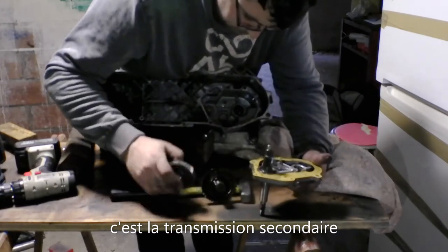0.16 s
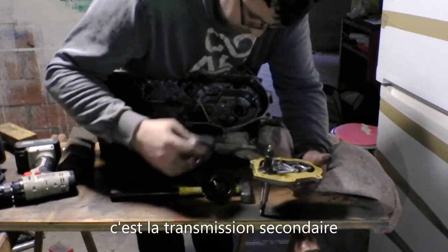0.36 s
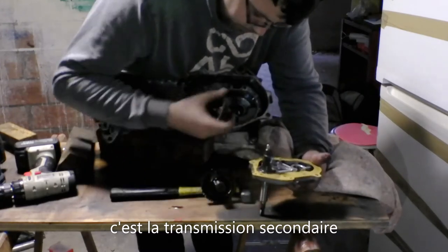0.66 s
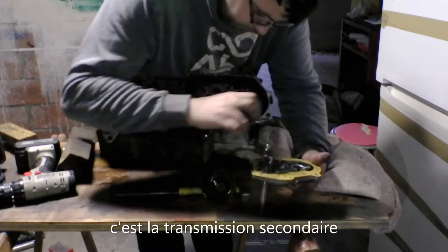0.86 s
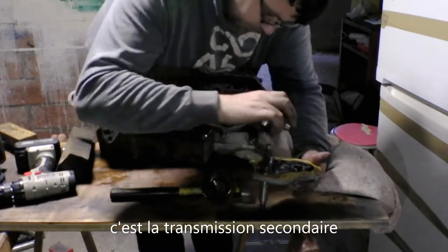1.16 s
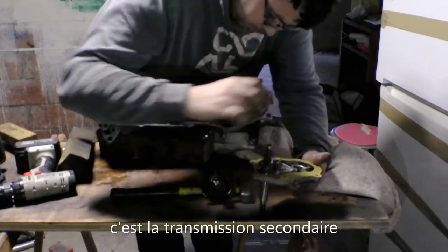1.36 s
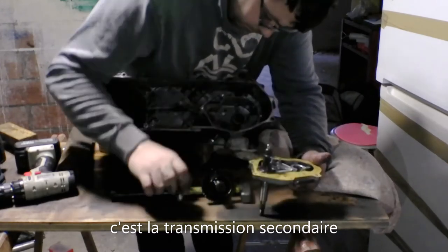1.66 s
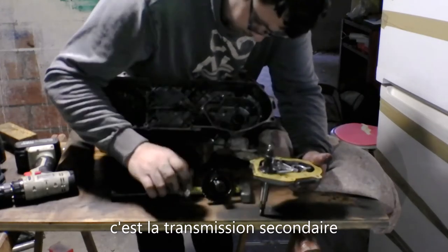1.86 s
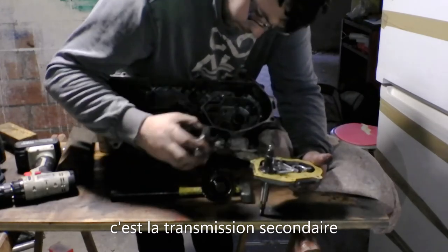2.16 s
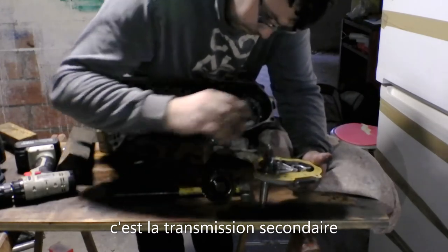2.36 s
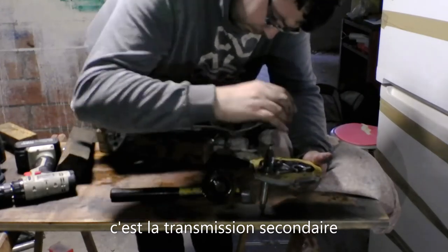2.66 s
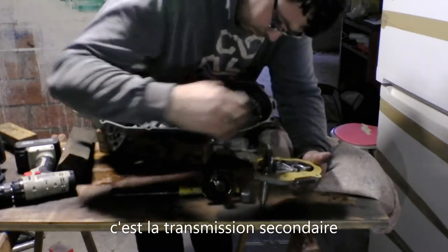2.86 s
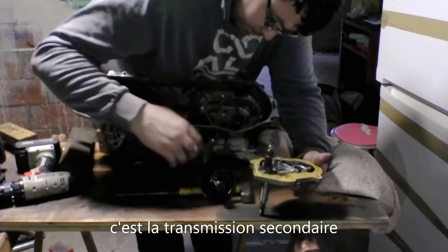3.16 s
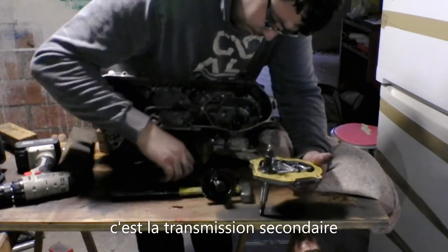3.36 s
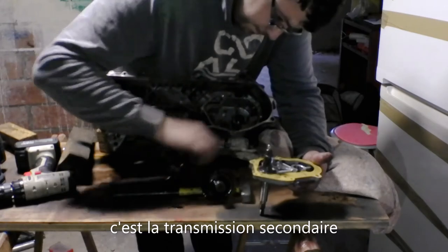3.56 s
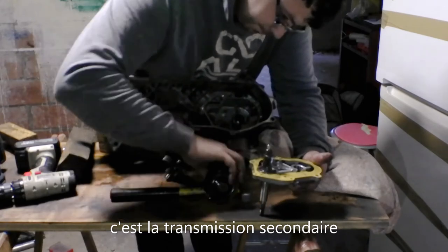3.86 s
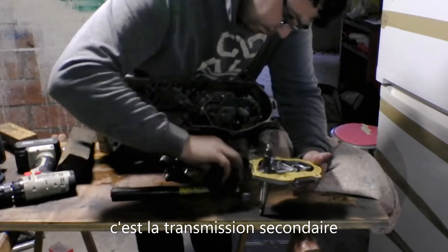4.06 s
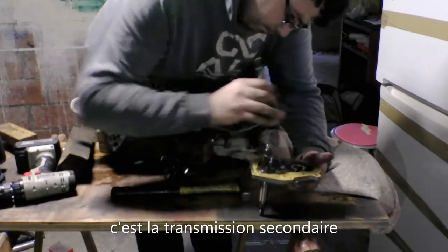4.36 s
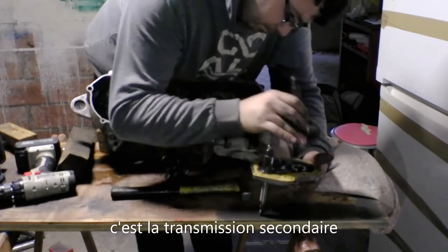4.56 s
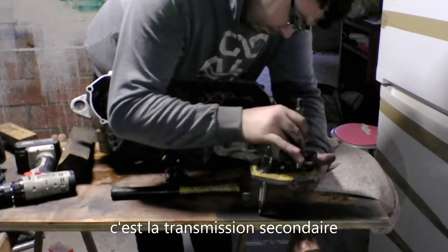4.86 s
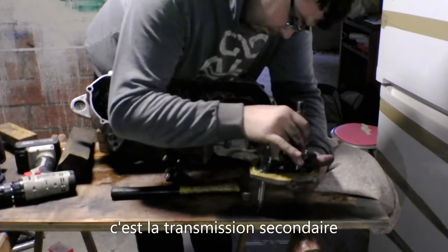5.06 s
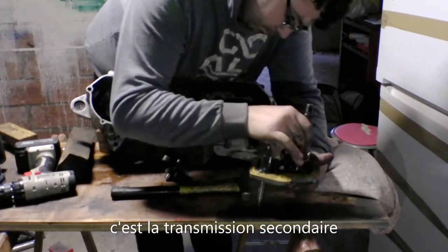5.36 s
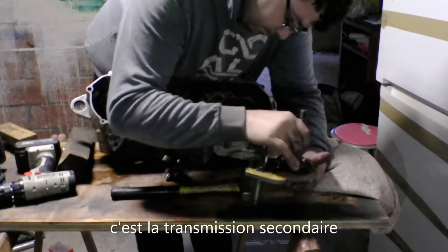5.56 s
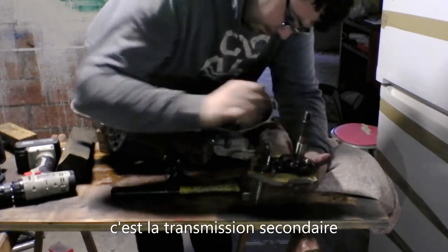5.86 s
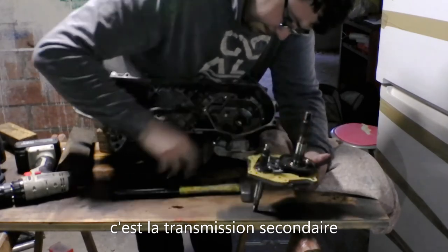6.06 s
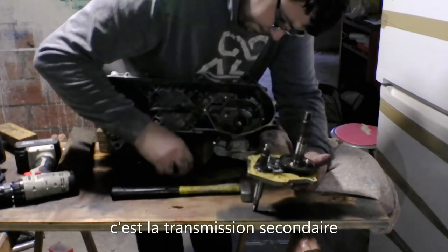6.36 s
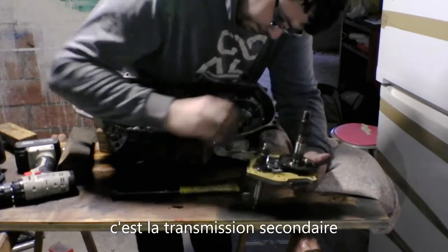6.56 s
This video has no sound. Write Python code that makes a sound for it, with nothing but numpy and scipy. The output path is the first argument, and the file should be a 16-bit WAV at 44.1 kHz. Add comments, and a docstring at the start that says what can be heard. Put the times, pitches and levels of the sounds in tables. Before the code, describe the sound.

A steel gear drags off an engine case and comes free with a loud, rattling clunk. After a pause it is set on a wooden bench with two dull knocks, and another gear clinks sharply. Gears and shafts then slide and tap against a metal cover, before a faint sleeve brush and a small scrape. The microphone is a couple of metres away in a small workshop with quiet hiss.

```python
"""Gearbox parts on a wooden bench in a small workshop, one microphone a couple of metres away.
First a gear drags off the engine case with a clunk (1.4 s). It is set down on the bench (3.3 s), and a
second gear clinks as it is picked up (4 s). From 4.7 s gears and shafts are slid and knocked into the
cover plate; last, a sleeve brushes the bench and a small part scrapes over it. Each blow rings a part's
modes with a short, dense clatter; the room answers, over a quiet hiss."""
import sys
import numpy as np
from scipy import signal
from scipy.fft import rfft, irfft, next_fast_len
from scipy.io import wavfile
from scipy.ndimage import uniform_filter1d, minimum_filter1d

SR = 44100
rng = np.random.default_rng(int(sys.argv[2]) if len(sys.argv) > 2 else 0)


def output_pcm(signal):
    """Save a mono or channel-first signal as 16-bit PCM at the path in sys.argv[1].

    Samples are clipped to [-1, 1] before scaling.
    """
    pcm = np.clip(np.atleast_2d(signal).T, -1, 1) * 32767
    wavfile.write(sys.argv[1], SR, np.round(pcm).astype(np.int16))


N = 295911

# blows at the bench: (t/s, part, strength/dB, hardness of the contact as a treble corner f/Hz)
BLOWS = [ (1.387, "case", -27.5, 1500), (1.388, "bench", -22, 1000), (1.3913, "pin", -25.5, 13000),
         (1.3984, "pin", -21.5, 13000), (1.402, "case", -22, 4000), (1.4157, "case", -9, 1600),
         (1.4256, "case", -15.5, 9000), (1.429, "pin", -11.5, 13000), (1.4319, "pin", -10, 11000),
         (1.436, "pin", -25, 8000), (1.441, "case", -18.5, 3000), (1.4550, "cover", -29, 2000),
         (1.457, "cover", -17.5, 1250), (1.478, "pinion", -30.5, 1620), (1.539, "cover", -32, 1700),
         (1.555, "cover", -35.5, 2200), (3.3268, "bench", -25.5, 1050), (3.3280, "wheel", -27, 1600),
         (3.4966, "bench", -24.5, 2000), (3.4954, "wheel", -20, 11100), (3.5145, "wheel", -24.5, 700),
         (3.953, "wheel", -46, 2500), (4.0130, "gear", -9, 13000), (4.018, "case", -24.5, 3000),
         (4.0250, "case", -24.5, 2500), (4.0387, "cover", -24.5, 1200), (4.0451, "case", -25, 1000),
         (4.0551, "cover", -24, 1300), (4.061, "case", -27.5, 1000), (4.082, "cover", -48, 1500),
         (4.7166, "shaft", -16.5, 12000), (4.7293, "pinion", -27, 2500), (4.8446, "pinion", -25.5, 1700),
         (4.8549, "pinion", -30, 1700), (4.875, "pinion", -37.5, 9000), (4.885, "pinion", -21.5, 12000),
         (4.8925, "cover", -29.5, 2500), (4.9017, "pinion", -37, 9000), (5.275, "washer", -53.5, 12900),
         (5.343, "washer", -43, 11900), (5.3586, "cover", -28.5, 2000), (5.3712, "case", -37.5, 2000),
         (5.4783, "cover", -14.5, 9000), (5.494, "case", -30.5, 2000), (5.555, "cover", -46, 1800),
         (6.089, "pinion", -44.5, 12000)]


def knocks():
    """Parts strike and bounce on each other and on the bench, one blow for each contact."""
    out = np.zeros(N)
    for at_s, part, strength_db, hard_hz in BLOWS:
        start = int(at_s * SR)
        sound = blow(part, strength_db, hard_hz)[:N - start]
        out[start:start + len(sound)] += sound
    return out


# ringing modes of each part: (f/Hz, relative level/dB, t60/s)
CASE = [(175, -15, 0.22), (204.2, -10.5, 0.18), (241, -5.5, .16), (388, -6.5, .13), (459.5, 1.5, 0.18),
        (541, 2, .16), (583, -13, 0.15), (662, -18.5, .14), (810, -2.5, 0.12), (880, -5, .17),
        (940, -4, 0.14), (997, -7, 0.1), (1092, 1, 0.09), (1180, -14, .17), (1210, -8.5, 0.11),
        (1252, -8, 0.13), (1315, -5, 0.16), (1475, -9, 0.09), (1537, -10, 0.13), (1723, -12, .22),
        (1870, -14, 0.37), (1896, -12.5, 0.71), (2210, -15, 0.14), (2650, -20, .24), (2950, -16.5, .3),
        (2970, -18.5, .22)]
PIN = [(1920, -10, .12), (2190, -8.5, 0.072), (2610, -4, .08), (2904, -4.5, 0.11), (2983, -5.5, 0.053),
       (5346, -6.5, 0.06), (5650, -9, 0.11), (6720, -11, 0.085), (7270, -9.5, 0.11)]
BENCH = [(164, -11, .11), (187, -4, 0.12), (238, -4, .075), (326, -13.5, 0.23)]  # the wooden top
WHEEL = [(475.5, 0, 0.12), (550, -12, 0.074), (547, -17, 0.092), (657, -11.5, 0.09), (697, -20.5, 0.12),
         (1057, -13, .11), (1181, -15.5, 0.037), (1346, -19.5, 0.072), (1580, -17, .035),
         (1766, -12.5, .08), (2410, -13, .05), (2652, -8, 0.053), (2726, -7.5, 0.062), (3110, -10.5, .03),
         (3635, -15.5, .045), (3870, -14, 0.035), (4414, -11, 0.03)]  # the gear set down on it
GEAR = [(2993, 4, .24), (6030, -11, .11), (6693, -9.5, .24), (7225, -26, .15), (7362, -16.5, .21),
        (9560, -32, .04), (11600, -31, .07)]
SHAFT = [(420, -8, .06), (689, -14, .07), (1080, -1, .045), (1190, 0, .035), (1400, -11, .05),
         (1556, -13, .07), (1822, -7, .07), (1943, -13, .07), (2139, -9, .055), (3018, -14, .13),
         (3341, -4, .045), (3500, -10, .03), (3672, 4.5, .066), (3817, -4, .115), (4129, -17, .17),
         (4286, -15, .04), (5770, -20, .05), (5884, -23, .09), (6040, -25, .15), (7371, -18, .17)]
PINION = [(1125, -9.5, 0.05), (2070, -6.5, .1), (2140, 0.5, .07), (2360, -10, .12), (2455, 2, 0.058),
          (2740, 2.5, .048), (3040, -2, 0.079), (3200, -24, .086), (3470, 8.5, 0.032), (3580, 7.5, 0.045),
          (3670, -6.5, .1), (4080, 1, 0.11), (4110, -14, 0.12), (4160, -10, 0.074), (5100, -18, 0.065),
          (5970, -21.5, 0.073), (6550, -20, .06), (7800, -17, 0.04)]
WASHER = [(2650, 4.5, 0.09), (2720, 4.5, .06), (3600, 5, 0.077), (4500, -7, 0.1), (6410, -2.5, .04),
          (7560, -8, .04)]
COVER = [(1040, -20.5, 0.06), (1090, -8.5, 0.055), (1200, 3.5, 0.038), (1330, -2.5, 0.035),
         (1456, -16.5, .11), (1975, -5, .03), (2125, -13, 0.045), (2340, -15.5, 0.085), (2577, -7, .015),
         (2790, -25, 0.14), (3390, -16, 0.11), (3480, -14, 0.029), (3880, -6.5, 0.024), (4400, -17, 0.056),
         (4440, -13.5, 0.041), (6270, -20, .025)]
# spectrum of each part's dense, quickly damped modes: (f/Hz, relative level/dB)
CASE_DENSE = [(40, -26.5), (100, -14), (190, -1.5), (480, 0.5), (620, 3.5), (720, -6), (850, -0.5),
              (1150, -0.5), (1700, -16.5), (3000, -37), (5000, -14), (8000, -26), (12000, -43.5)]
PIN_DENSE = [(100, -23), (500, -7.5), (1200, 6.5), (2200, -8.5), (3200, -5.5), (4500, -3), (6500, -6),
             (7800, -14), (9000, -34), (12000, -35)]
BENCH_DENSE = [(50, -28.5), (115, -18.5), (175, 5), (250, 5), (340, -3.5), (850, -18.5), (3000, -44)]
WHEEL_DENSE = [(100, -30), (340, -13), (480, -2), (620, -6), (850, -14.5), (1500, -11), (2200, -14.5),
               (4400, -20), (6300, -24), (8500, -42), (12000, -79)]
GEAR_DENSE = [(100, -40), (400, -6.5), (1200, -1), (2200, -2.5), (3000, -2.5), (4100, 6), (4900, -2),
              (5400, -16.5), (6500, -8), (7600, -2), (9000, -36), (12000, -63.5)]
SHAFT_DENSE = [(80, -29.5), (290, -25.5), (400, -8.5), (620, -1), (1150, -1.5), (1800, 0), (2600, -8.5),
               (3600, -1), (4800, -14.5), (7500, -20), (8800, -43), (12000, -62.5)]
PINION_DENSE = [(100, -29.5), (500, -9), (850, -7), (1150, 6.5), (1600, -1), (2300, 3), (4000, -1),
                (5000, -8.5), (7800, -11), (9500, -26.5), (12000, -33.5)]
COVER_DENSE = [(70, -22), (200, -15.5), (450, -13.5), (700, -12), (1170, 4.5), (1600, -8), (2050, -5.5),
               (3000, -11.5), (3800, -7.5), (5400, -23.5), (6700, -14.5), (8800, -33), (12000, -34.5)]
# part: (modes, dense spectrum, ring over clatter in a firm blow/dB, clatter t60/s,
#   first crack over clatter/dB, delay until the fingers close/s, t60 of their grip/s)
PARTS = {"case": (CASE, CASE_DENSE, -8, 0.052, -12, 0.026, .45),
         "pin": (PIN, PIN_DENSE, -10.5, 0.024, -5, .03, .4),
         "bench": (BENCH, BENCH_DENSE, 15.5, 0.09, -8, 0.045, .35),
         "wheel": (WHEEL, WHEEL_DENSE, 9.1, 0.1, -14, 0.035, 0.12),
         "gear": (GEAR, GEAR_DENSE, -11, 0.019, 0, 0.074, .5),
         "shaft": (SHAFT, SHAFT_DENSE, 2.9, 0.069, -9.5, .03, .45),
         "pinion": (PINION, PINION_DENSE, 0, 0.053, -10.5, .025, 0.37),
         "washer": (WASHER, PINION_DENSE, 18, 0.15, -15.5, .03, .2),
         "cover": (COVER, COVER_DENSE, 2.7, 0.05, -8, .03, .5)}
FIRM_DB, BOUNCE_DB_PER_DB = -16.5, 0.72  # a firm blow; extra loss of ring for each dB lighter


def blow(part, strength_db, hard_hz):
    """One contact: a softer touch leaves the high modes unstirred; a firmer one rings more freely."""
    def contact_db(hz):
        return -10 * np.log10(1 + (hz / hard_hz) ** 2 + (hz / hard_hz / 2) ** 4)

    modes, dense, free_db, clatter_t60, crack_db, grip_s, grip_t60 = PARTS[part]
    t = np.arange(2 ** 14) / SR
    ring = np.zeros(len(t))
    for k, (hz, db, t60) in enumerate(modes):
        swing = (-1) ** k * undb(db + contact_db(hz))  # neighbouring modes start in opposite directions
        build_up = 1 - np.exp(-2 * hz * t)
        ring += swing * np.sin(2 * np.pi * hz * t) * fade(t, t60) * build_up
    ring_db = strength_db + free_db + BOUNCE_DB_PER_DB * (strength_db - FIRM_DB)
    grip = fade(np.maximum(t - grip_s, 0), grip_t60)
    # the contact jolts the whole part at once, then scatters into its dense modes
    scatter = dense_modes(t, clatter_t60)
    jolt = undb(crack_db) * np.linalg.norm(scatter) * (t == 0)
    clatter = colour(jolt + scatter, [(hz, db + contact_db(hz)) for hz, db in dense])
    clatter *= np.linalg.norm(fade(t, clatter_t60)) / np.linalg.norm(clatter)  # starts near rms 1
    return undb(ring_db) * ring * grip + undb(strength_db) * clatter


def dense_modes(t, t60):
    """Countless overlapping modes: decaying noise, its spectral dips and peaks partly evened out."""
    spectrum = rfft(rng.standard_normal(len(t)) * fade(t, t60))
    evened = spectrum / np.sqrt(np.abs(spectrum) + 1e-12)
    return irfft(evened, len(t)) * fade(t, 4 * t60)


# spectra of rubbing surfaces: (f/Hz, relative level/dB)
DRAG_COLOUR = [(50, -14), (170, 8), (500, -1), (1300, -2.5), (2100, -5), (2800, -2.5), (4200, -9),
               (6500, -10.5), (8200, -16), (10000, -16.5), (13000, -37.5)]  # steel over splines and case
BRUSH_COLOUR = [(60, -2), (140, -4), (210, 14.5), (330, -0.5), (1000, -1), (1800, -8), (2700, -1),
                (3400, -8.5), (4600, -7.5), (7000, -11), (12000, -21)]  # sleeve and hand over the bench
# resonances stirred by sliding: (f/Hz, width/Hz, relative level/dB)
SPLINE_RING = [(1028, 180, -1), (1539, 67, 0.5), (1884, 90, -2.5), (2600, 74, -1), (2925, 110, -3),
               (5540, 350, -19), (6650, 120, -11)]  # a gear dragged off its splines
SHAFT_RING = [(1200, 410, -6.5), (2500, 700, -2.5), (3650, 480, -3.5), (4110, 300, -5.5), (6100, 930, -10),
              (7670, 770, -14)]  # a gear along its shaft
SCRAPE_RING = [(1630, 370, -3), (2184, 180, 2), (2680, 93, -1.5), (3010, 150, 0.5)]  # a small steel part over the bench
SQUEAK_RING = [(2580, 180, 4), (2680, 170, -1), (3800, 180, -6)]  # a washer along its shaft
# strokes of one surface over another: (t/s, surface, level/dB, attack/s, hold/s, release/s)
STROKES = [ (1.282, "drag", -30, 0.15, 0.026, .11), (1.498, "drag", -41.5, 0.05, 0.018, 0.094),
           (3.63, "drag", -54.5, 0.037, 0.034, 0.081), (4.803, "shaft", -49, 0.026, .02, 0.048),
           (4.883, "shaft", -46.5, 0.018, .025, 0.031), (5.078, "squeak", -55.5, 0.044, 0.014, .025),
           (5.258, "shaft", -60.5, 0.021, 0.14, .05), (5.396, "shaft", -46, 0.035, 0.035, 0.0373),
           (5.802, "brush", -56, 0.055, 0.072, 0.3), (6.061, "brush", -53.5, 0.057, .17, 0.073),
           (6.266, "scrape", -49, 0.03, 0.03, .17), (6.386, "scrape", -67, 0.059, 0.13, 0.12)]
SPLINE_DB = -5.5  # spline ring over the drag noise


def sliding():
    """Steel drags on the case, a sleeve brushes the bench, and small parts sing as they are pushed."""
    slips = friction(slips_per_s=1500, uneven_db=0.1)
    drag = colour(friction(slips_per_s=2200, uneven_db=-0.5), DRAG_COLOUR)
    splines = resonate(slips, SPLINE_RING)
    surfaces = {"drag": unit(drag) + undb(SPLINE_DB) * unit(splines),
                "shaft": resonate(slips, SHAFT_RING),
                "brush": colour(friction(slips_per_s=2700, uneven_db=1.5), BRUSH_COLOUR),
                "scrape": resonate(slips, SCRAPE_RING),
                "squeak": resonate(slips, SQUEAK_RING)}
    return sum(undb(db) * unit(surfaces[surface]) * stroke(at_s, *shape)
               for at_s, surface, db, *shape in STROKES)


def friction(slips_per_s, uneven_db):
    """Rough surfaces catch and let go: dense slips of uneven size over a fine hiss."""
    lets_go = rng.random(N) < slips_per_s / SR
    sizes = rng.standard_normal(N) * undb(uneven_db * rng.standard_normal(N))
    return unit(unit(lets_go * sizes) + 1.2 * rng.standard_normal(N))


def stroke(at_s, attack, hold, release, speed_power=1.91):
    """The hand speeds up, keeps its pace and slows to rest; friction noise grows as a power of speed."""
    corners_s = at_s + np.cumsum([0, attack, hold, release])
    speed = np.interp(np.arange(N) / SR, corners_s, [0, 1, 1, 0])
    return speed ** speed_power


# echoes reaching the microphone from near surfaces: (delay/s, level/dB)
ECHOES = [(.0025, -19), (.0049, -21), (0.0113, -17), (0.0172, -20)]
# decay of the workshop: (f/Hz, t60/s)
ROOM_DECAY = [(120, 0.45), (250, .33), (480, 0.22), (1200, 0.22), (3000, 0.2), (7000, 0.27), (12000, 0.19)]
TAIL_DB, TAIL_BUILD_S = -18, 0.014


def workshop(x):
    """Bench top and walls echo at once; a short diffuse tail follows, lasting longest in the bass."""
    t = np.arange(SR // 2) / SR
    noise = rfft(rng.standard_normal(len(t)))
    tail = np.zeros(len(t))
    for centre, t60 in ROOM_DECAY:
        band = along(freqs(len(t)), [(hz, float(hz == centre)) for hz, _ in ROOM_DECAY])
        tail += irfft(noise * band, len(t)) * fade(t, t60)
    tail *= 1 - np.exp(-(t / TAIL_BUILD_S) ** 2)
    response = undb(TAIL_DB) * tail / np.linalg.norm(tail)
    for delay, db in ECHOES:
        response[int(delay * SR)] += undb(db)
    return x + signal.fftconvolve(x, response)[:N]


# spectrum of the room tone at the microphone: (f/Hz, relative level/dB)
HISS = [(15, -60), (25, -26), (59, -11), (92, -8.5), (133, -4), (237, 0.5), (411, -2), (469, -2.5),
        (855, -4), (975, -5.5), (2250, -11.5), (2440, -11.5), (3080, -13), (12000, -16.5), (13000, -21)]
HISS_DB = -57.5


def room_tone():
    """Still air of the room and the microphone's own hiss."""
    return undb(HISS_DB) * unit(colour(rng.standard_normal(N), HISS))


def resonate(x, resonances):
    """Pass a signal through a part's resonances, side by side."""
    bins = freqs(N)
    response = sum(undb(db) / (1 + 2j * (bins - hz) / width) ** 2 for hz, width, db in resonances)
    return irfft(rfft(x) * response, N)


def colour(x, points):
    """Causal filter through (f/Hz, level/dB) points, built from the cepstrum of its log gain."""
    size = next_fast_len(len(x), True)
    gain = undb(along(freqs(size), points))
    cepstrum = irfft(np.log(gain), size)
    cepstrum[1:size // 2] *= 2
    cepstrum[size // 2 + 1:] = 0
    return irfft(rfft(x, size) * np.exp(rfft(cepstrum)), size)[:len(x)]


def along(hz, points):
    """Read (f/Hz, value) points on a log-frequency axis."""
    f, value = np.transpose(points)
    return np.interp(np.log(hz + 1), np.log(f), value)


def freqs(size):
    """Frequencies of the bins of a real transform."""
    return np.fft.rfftfreq(size, 1 / SR)


def fade(t, t60):
    """Exponential decay by 60 dB in t60."""
    return np.exp(-np.log(1000) * t / t60)


def undb(db):
    """Decibels to gain."""
    return 10 ** (np.asarray(db) / 20)


def unit(x):
    """Scale to rms 1."""
    return x / np.sqrt(np.mean(x ** 2))


def scene():
    """Knocks and slides from a couple of metres away in the workshop, over its room tone, in mono."""
    low_cut = signal.butter(2, 104, "high", fs=SR, output="sos")  # the microphone takes up little deep bass
    handling = signal.sosfilt(low_cut, knocks() + sliding())
    return (workshop(handling) + room_tone())[None]


CEILING, TOP_HZ = 0.93, 13000


def record(dry):
    """A fast limiter holds down the highest peaks; the recorder cuts the top."""
    span = SR // 500  # 2 ms
    allowed = CEILING / np.maximum(np.abs(dry), CEILING)
    gain = uniform_filter1d(minimum_filter1d(allowed, span), span)
    high_cut = signal.ellip(10, .2, 70, TOP_HZ, fs=SR, output="sos")
    return signal.sosfilt(high_cut, dry * gain)


dry = scene()
out = record(dry)
output_pcm(out)
```